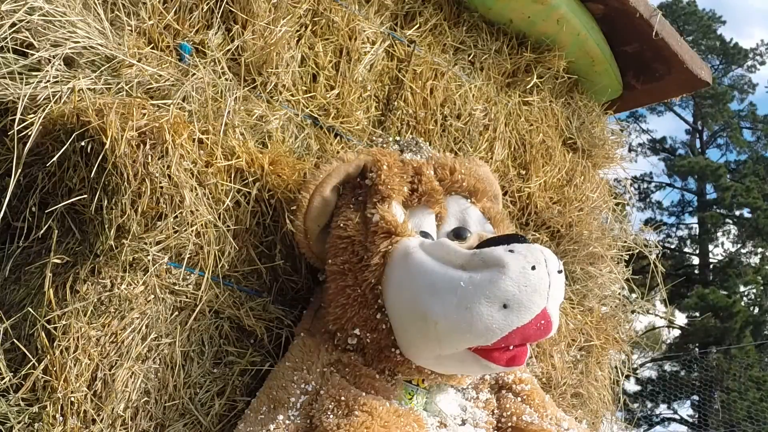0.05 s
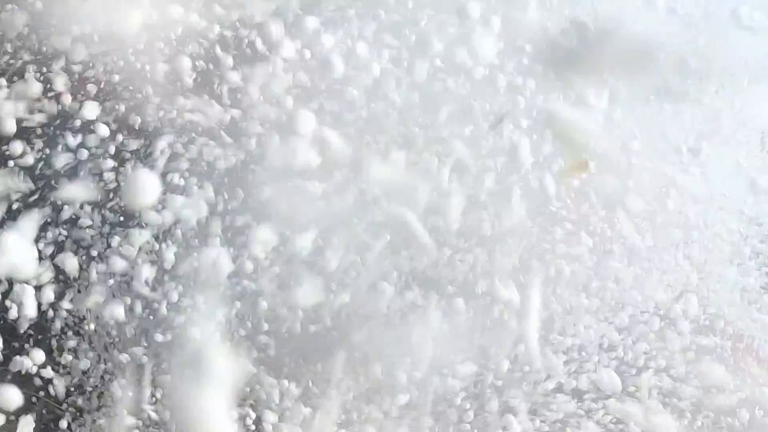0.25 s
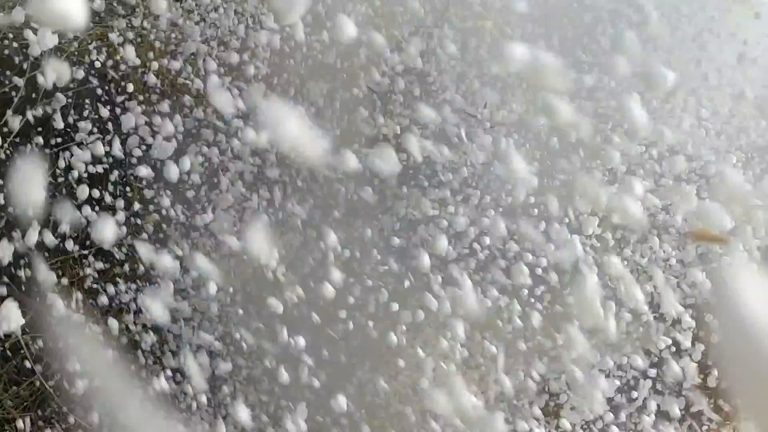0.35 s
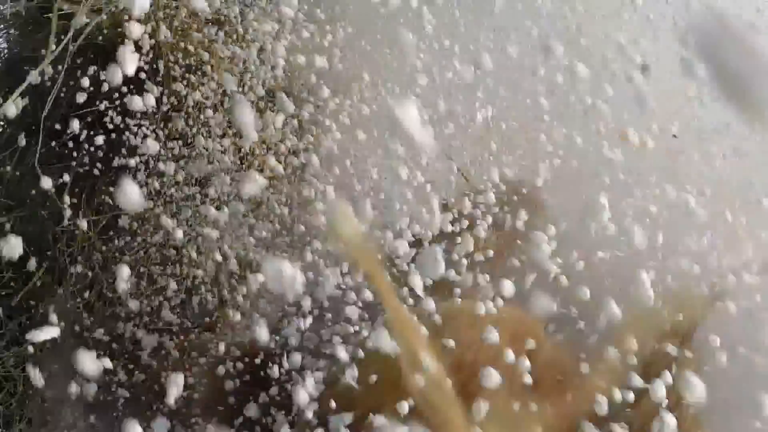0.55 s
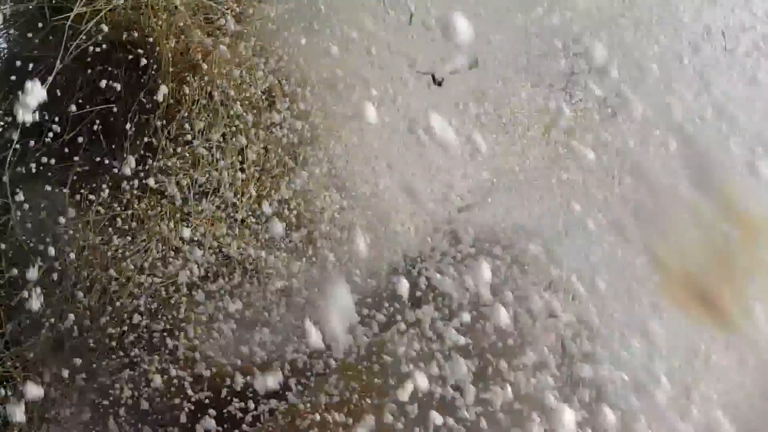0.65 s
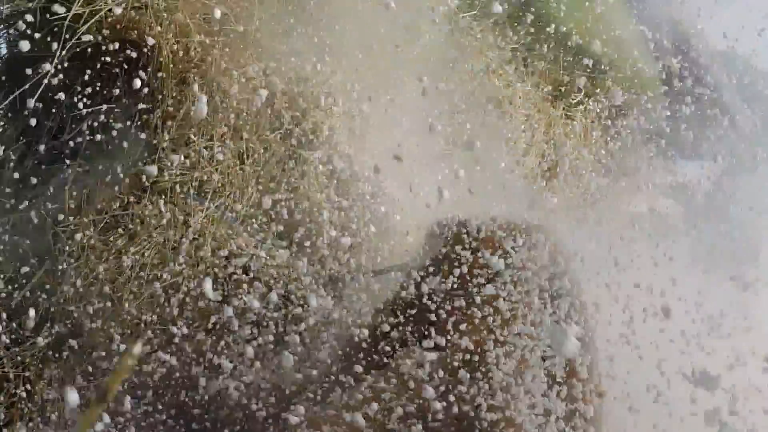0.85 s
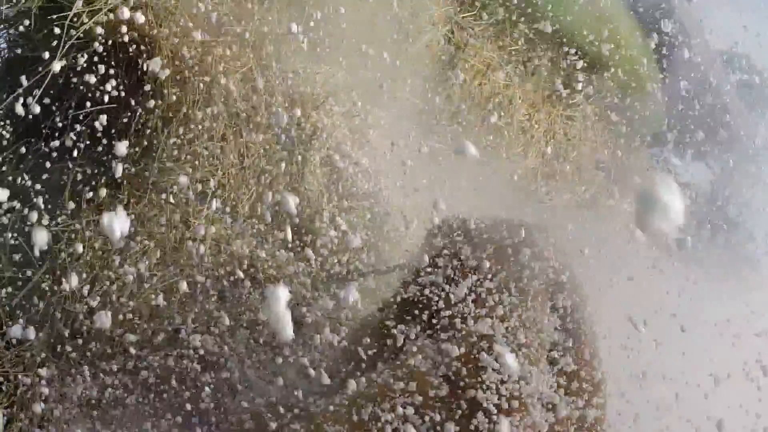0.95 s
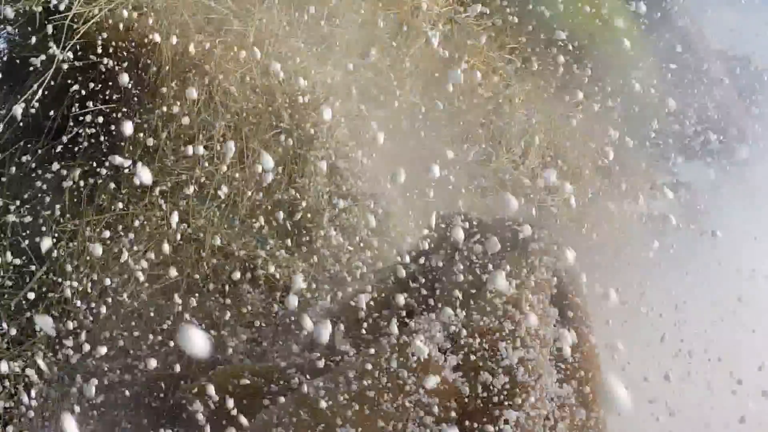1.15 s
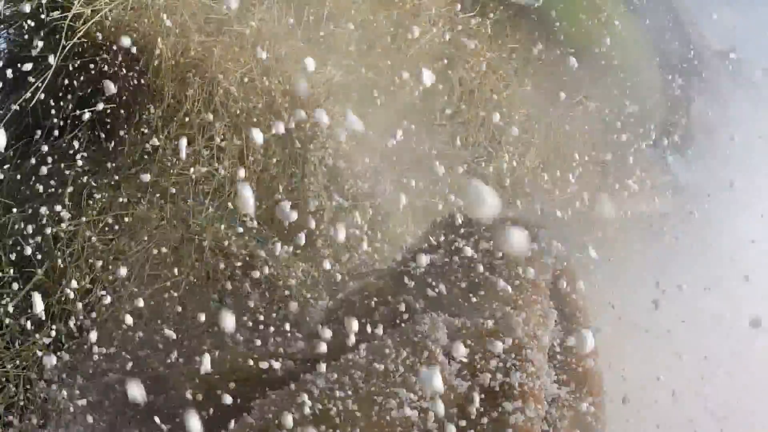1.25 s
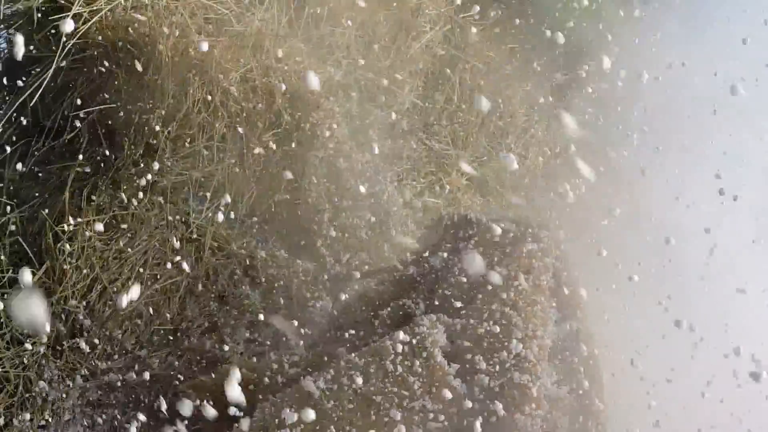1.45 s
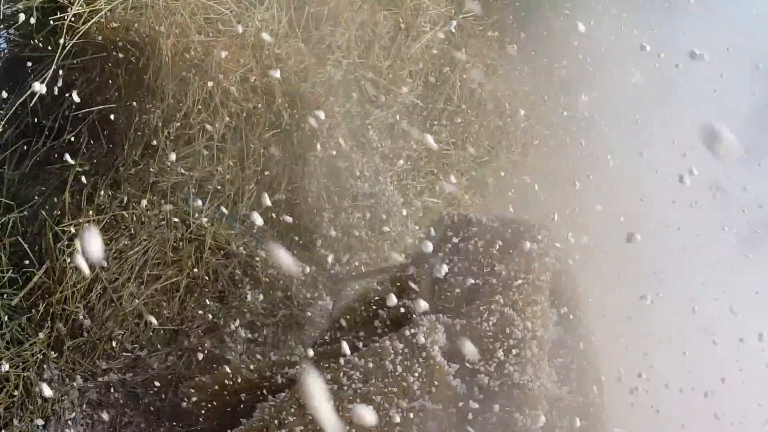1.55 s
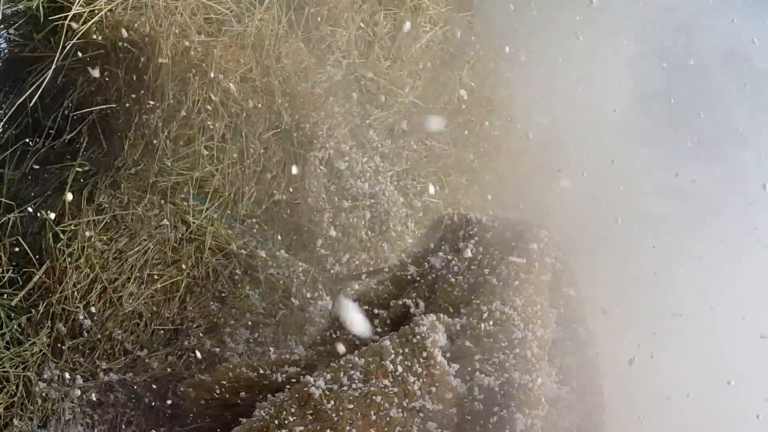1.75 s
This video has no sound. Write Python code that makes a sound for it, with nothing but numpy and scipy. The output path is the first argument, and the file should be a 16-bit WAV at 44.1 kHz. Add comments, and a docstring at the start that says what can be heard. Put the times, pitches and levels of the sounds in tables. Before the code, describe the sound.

After a brief near-silence outdoors, a pressurised bottle explodes right beside a small camera with a hard clipped crack; spray hisses and pellets rattle and knock on its plastic housing, thinning before a second small flurry.

```python
"""Outdoors, quiet air and a distant hum lie under everything; a faint noise rustle comes just before the burst.
A pressurised bottle bursts close beside a small camera: steep pressure fronts and a crack overload its microphone.
At once pellets (noise scratches through resonances) and spray (dense noise grains) pelt the plastic housing;
its modes ring, lumps knock it and it swings on its mount, while the gas cloud buffets the microphone as low noise.
The spray thins out, then swells again with a second cluster of pellets before the air and hum remain."""
import sys
import numpy as np
from scipy import signal
from scipy.fft import rfft, irfft, next_fast_len
from scipy.io import wavfile
from scipy.ndimage import uniform_filter1d, map_coordinates

SR = 44100
rng = np.random.default_rng(int(sys.argv[2]) if len(sys.argv) > 2 else 0)


def store_pcm(level_fs):
    """Save levels as 16-bit WAV."""
    pcm = np.round(np.clip(level_fs, -1, 1) * 32767).astype(np.int16)
    wavfile.write(sys.argv[1], SR, np.atleast_2d(pcm).T)


N = 79380

# open air around the microphone: pitch_hz, density_db (relative, per Hz)
AIR_SPECTRUM = [(25, -12), (60, -14.5), (118, -8.5), (250, -13), (500, -18.5), (1000, -23), (1500, -25),
                (3100, -29.5), (5000, -34), (6060, -32.5), (7350, -41.5), (12000, -45.5), (15000, -56)]
AIR_DB = -56.5
HUM_HZ, HUM_WIDTH_HZ, HUM_DB = 105, 2.1, -61.5

# gas cloud buffeting the microphone: start_s, level_db
BUFFET_LEVEL = [(.27, -47), (.3, -39.5), (.45, -41), (.55, -50.5), (.8, -53), (1.2, -61), (1.5, -61.5)]
# its bass colour: pitch_hz, density_db (relative, per Hz)
BUFFET_SPECTRUM = [(25, -11.5), (50, 9), (100, 3), (170, -1.5), (280, -13.5), (400, -23)]
# low mids of the gas cloud: start_s, level_db
SWIRL_LEVEL = [(0.27, -48.5), (0.37, -49.5), (0.42, -46.5), (0.526, -54), (0.678, -58.5), (0.8, -73)]
# their colour: pitch_hz, density_db (relative, per Hz)
SWIRL_SPECTRUM = [(150, -6), (300, -7), (600, -11.5), (1000, -13.5), (1600, -10.5)]

# swings of the camera mount after a shove: start_s, level_db, pitch_hz
MOUNT_SWINGS = [(0.256, -28.5, 128), (0.306, -30, 99), (0.343, -27, 141), (0.376, -23.5, 128.5),
                (0.419, -29.5, 171.4), (0.429, -20.5, 64.8), (0.528, -34, 89), (0.58, -27, 70.5),
                (0.653, -31, 87), (0.774, -27, 89), (0.829, -29.5, 88.7), (.89, -41, 89), (0.939, -36, 105),
                (0.991, -39.5, 110.3), (1.029, -39.5, 88.4), (1.096, -33, 100.7), (1.169, -46.5, 83.4),
                (1.21, -39.5, 85.3), (1.371, -43.5, 101)]
SWING_RISE_S, SWING_T60_S = 0.0053, 0.14

# dull knocks on the housing: start_s, level_db, pitch_hz
KNOCKS = [(0.2522, -26, 350), (0.264, -13.5, 320), (.291, -27.5, 700), (0.302, -24, 248),
          (.318, -25.5, 196), (.348, -28, 450), (0.38, -36, 400), (0.388, -21, 215), (0.4223, -20, 393),
          (0.464, -25.5, 298), (.51, -28, 285), (.578, -26, 696), (0.6108, -29, 607), (0.705, -18.5, 600),
          (.763, -27, 550), (0.795, -28.5, 785), (0.8602, -32, 700), (.879, -33, 825), (1.22, -33, 650),
          (1.2972, -29, 620), (1.447, -34.5, 700), (1.492, -33, 635)]
KNOCK_FADE_CYCLES = 0.54  # until it has faded to about a third

# resonances of the struck housing, in three groups: pitch_hz, width_hz, level_db (relative)
LOW_RESONANCES = [(1676, 410, -6), (2433, 410, 3.5), (3440, 1200, -4)]
UPPER_RESONANCES = [(4822, 750, -5), (6470, 1100, -4.5)]
TREBLE_RESONANCES = [(8500, 2500, 0.5), (10850, 3600, 1.5), (13700, 9700, -6)]
LOW_EDGE_HZ, UPPER_EDGE_HZ = 3450, 5800  # these two groups fall off steeply above

# fine spray on the housing: start_s, level_db (of the summed groups, before their mix)
SPRAY_LEVEL = [(.24, -73), (.25, -44), (.27, -39), (.3, -35.5), (.4, -37.5), (.5, -43), (.56, -41.5),
               (.62, -47.5), (.7, -47), (.77, -57.5), (.81, -59.5), (1, -75), (1.35, -63.5), (1.4, -49.5),
               (1.53, -50), (1.6, -61.5), (1.7, -62.5), (1.8, -76)]
# gain of the spray's treble group as it thins: start_s, gain_db
SPRAY_TREBLE_GAIN = [(.24, 6), (.4, 5), (.7, -2), (1.3, -7)]
# mean mix of the spray, one per group low, upper, treble: level_db
SPRAY_MIX = [-3, -9.5, -22]
# steady hiss added to the grain envelope of rms 1, one row per group low, upper, treble: share (ratio)
SPRAY_HISS = [
    [1],
    [0.87],
    [.2],
]
GRAINS_PER_S, GRAIN_SPREAD_DB, GRAIN_FADE_MS = 2500, 3.5, .5
SHIFT_PER_S, SHIFT_DB = 60, 3.5  # pace and spread of the changes in balance

# hard pellets that ring the housing: start_s (nearest pellet is used), level_db, favoured_hz, loss_db (per octave)
RINGING_BLOWS = [(.2426, -11.5, 1900, 29), (.3972, -27, 1990, 25), (.6098, -17, 1130, 7.5),
                 (.6976, -30, 4700, 10), (.7053, -27, 2100, 10), (.7635, -18, 2000, 17),
                 (.8591, -29, 2220, 18), (.8786, -41, 1810, 8), (0.9921, -30, 2140, 16),
                 (1.1152, -37.5, 2250, 19), (1.2191, -30.5, 2320, 9.5), (1.2977, -21.5, 3040, -1),
                 (1.533, -35, 2106, 7)]
# modes of the housing: pitch_hz, level_db (relative), t60_s
HOUSING_MODES = [(1096, -14.5, 0.045), (1848, -19, 0.067), (2080, -10, 0.055), (2570, -0.5, 0.021),
                 (2710, -25.5, 0.062), (2790, -12.5, 0.044), (4170, -4, 0.036), (4970, -5, 0.021)]
MODE_SPREAD_DB = 0.32

# pellets on the housing: start_s, low_db, upper_db, treble_db (level of each group), length_ms
PELLETS = [(0.2426, -9.5, -7.5, -30, 2.64), (0.248, -34, -28, -41, 3.1), (0.262, -22.5, -28, -45, 3.7),
           (0.277, -45, -28, -42, 3), (0.2878, -33, -33, -45, 11), (0.3013, -38, -50, -49, 14),
           (0.3142, -45, -47, -52, 3.1), (0.3207, -48, -47, -54, 12), (0.3333, -38, -22.5, -42, 2.9),
           (0.338, -47, -42, -39, 5.5), (0.3494, -44, -19.5, -40, 3), (0.3552, -26, -29.5, -43.0, 5.8),
           (0.3646, -39, -28, -41, 4.1), (0.3726, -26, -34, -36, 3.3), (0.379, -26.5, -43, -51.0, 8.9),
           (0.3912, -30, -34.0, -45, 7.1), (0.3971, -19, -24, -51, 3.6), (0.4088, -29, -44, -59, 3.1),
           (0.4196, -36, -54, -58, 2.5), (0.4383, -47, -29, -49, 5.1), (0.453, -32, -31, -45, 3.4),
           (0.459, -30.5, -40, -40, 4.7), (0.472, -36, -50, -53, 4.7), (0.4902, -29, -34, -35, 2),
           (0.4957, -32, -56, -56, 9.3), (0.501, -27, -54, -55, 7.6), (0.5067, -34, -19.5, -55, 2.1),
           (0.5232, -25, -24.5, -53, 3.2), (0.532, -36, -30, -47, 3), (0.5542, -35, -27, -32.5, 3.0),
           (0.5594, -48, -37, -53, 2.5), (0.571, -33, -41.0, -61, 5.2), (0.5789, -22.5, -46, -48.0, 1.4),
           (0.5823, -39, -32, -45, 2), (0.6012, -23, -37, -44.5, 8), (0.6098, -17, -19.5, -47, 1.4),
           (0.618, -23, -35, -52, 4.3), (0.63, -34.0, -55, -63, 2.9), (0.6359, -29, -57, -71.0, 1.2),
           (0.6421, -28, -50, -63, 3.5), (0.652, -49, -33, -45, 1.6), (0.6569, -32, -18, -44, 3.7),
           (0.6646, -40, -48, -61.0, 2.2), (0.6875, -37, -40, -59, 1.6), (0.6978, -37, -13.5, -30.5, 0.95),
           (0.7053, -15, -45, -40, 2.2), (0.7142, -32, -41, -38.5, 1.8), (0.724, -28, -54, -62, 4.6),
           (0.7391, -25.5, -34, -58, 3.8), (0.754, -40, -59, -71.0, 2.6), (0.7627, -24, -35, -29.5, 7.3),
           (0.7726, -34, -35, -34, 5.3), (0.7838, -27, -46, -68, 1.7), (0.7915, -41, -68, -68.0, 9.4),
           (0.859, -24, -28.5, -31, 2.4), (0.8779, -29, -45.5, -69, 6.3), (0.92, -48.5, -60, -64, 1.3),
           (0.934, -93, -50.5, -51.5, 4.7), (0.9641, -44.5, -40.5, -52, 3.1), (0.9929, -21, -33, -47, 3.3),
           (1.0802, -40, -51.5, -65.5, 10.5), (1.1165, -31.5, -40, -54.5, 4.5), (1.151, -47.5, -69, -70, 2),
           (1.1984, -44, -55, -57, 5.7), (1.22, -20, -19.5, -35.5, 2.76), (1.2975, -7, -10, -46.5, 3.24),
           (1.3502, -46, -34.5, -51, 2.9), (1.3763, -34.5, -29.5, -55, 4.6), (1.382, -42, -26, -36, 3.6),
           (1.392, -27, -26.5, -40, 3), (1.3978, -31, -41, -37, 3.7), (1.4125, -37, -37, -44, 1.6),
           (1.4246, -33, -31, -32, 4.1), (1.4369, -39, -34, -44, 1.8), (1.44, -38, -48, -40, 2.0),
           (1.447, -31, -23, -42, 3.6), (1.4529, -26.5, -26.5, -37, 3.2), (1.4609, -34, -40, -37, 1.7),
           (1.4642, -38, -36, -60.0, 2.6), (1.4816, -33, -33.5, -44.5, 3.5), (1.4932, -25, -29, -44, 3.3),
           (1.5002, -34.5, -46, -49, 3.6), (1.5066, -35, -37.5, -52.0, 6.2),
           (1.5181, -29, -40.5, -33.5, 2.6), (1.53, -29, -35, -52, 4.2), (1.535, -28.0, -37, -38, 2.7),
           (1.557, -52.5, -47, -58, 5.2), (1.57, -39.5, -35, -44, 2.5), (1.5863, -33.5, -40, -38.5, 5.8),
           (1.598, -31.5, -53, -60, 4.1), (1.635, -54, -58, -67.5, 2), (1.67, -43, -51.5, -54.5, 3.3),
           (1.686, -35.5, -38, -40.5, 3.4), (1.6985, -38.5, -44, -45.5, 3.3),
           (1.7141, -37, -46, -45.5, 3.5)]
# loud pellets whose groups lean to or from their top resonance: start_s, low_lift_db, upper_lift_db
PELLET_LEANS = [(.262, -7, 3), (.277, 0, -5), (.3331, 4, -4.5), (.3492, 0, -22), (.3643, 0, 12),
                (.3968, -5.5, 2), (.4383, 4, -14), (.5063, -4, -27), (.6097, -10, -12), (.6569, -3, -7.5),
                (.6974, -7, -13), (.7054, -7, 0), (.7134, 10, 6), (.8587, 5, -9), (.9925, -0.5, 4),
                (1.22, 2, 8.5), (1.2975, 5, -3.5), (1.3501, -3.5, 14), (1.392, 9.5, 10), (1.447, 7, -8.5),
                (1.597, 10.5, 10)]
FADE_PER_LENGTH = 0.45  # the scratch fades to about a third in this share of its length
TICK_MS = 8.64  # first contact over the scratch: (this / length) squared, so short hits are nearly one tick
COLOUR_SPREAD, LEAN_SPREAD_DB, LEAN_MATCH_S = .025, 4, .003

# pressure fronts, direct then off nearby surfaces: start_s, level_db, push_ms, rebound (share), rise_ms
SHOCK_FRONTS = [(.23931, 24.5, .99, 1, .2), (.24043, 20, .06, 0, .08), (.24185, 25.5, .27, 0, .4),
                (.2436, 5.5, 1.5, .3, .9)]
# colour of the crack and the rustle: pitch_hz, density_db (relative, per Hz)
CRACK_SPECTRUM = [(300, 3.5), (1500, 5.5), (4000, -4), (8000, -12.5), (15000, -42)]
CRACK_S, CRACK_DB, CRACK_T60_S = .2385, -6.5, 0.017
RUSTLE_S, RUSTLE_DB, RUSTLE_T60_S = .141, -50, 0.082

# the microphone
BASS_CUT_HZ, CLIP_HARDNESS, TOP_HZ = 25, 14, 15700


def amp(db):
    """Amplitude ratio of a level in dB."""
    return 10 ** (np.asarray(db) / 20)


def unit(x):
    """x scaled to rms 1."""
    return x / np.sqrt(np.mean(x ** 2) + 1e-20)


def filtered(x, response):
    """x shaped by a complex response of frequency, zero-padded so that tails do not wrap."""
    size = next_fast_len(N + SR // 2)
    return irfft(rfft(x, size) * response(np.fft.rfftfreq(size, 1 / SR)), size)[..., :N]


def noise(spectrum):
    """Coloured noise of rms 1, with steep skirts outside the spectrum."""
    below = (spectrum[0][0] * .7, -120)
    above = (spectrum[-1][0] * 1.15, -120)
    f, db = np.transpose([below] + list(spectrum) + [above])
    colour = lambda hz: amp(np.interp(np.log(hz + 1), np.log(f), db))
    return unit(filtered(rng.standard_normal(N), colour))


def curve(rows):
    """Gain per sample: practically silent before the first row, held after the last."""
    s, db = np.transpose(rows)
    return amp(np.interp(np.arange(N) / SR, s, db, left=-120, right=db[-1]))


def since(s):
    """Seconds elapsed since s, and whether it has come."""
    t = np.arange(N) / SR - s
    return np.maximum(t, 0), t >= 0


def peaks(table):
    """Response of causal damped resonances, summed with alternating sign."""
    def response(f):
        total = 0
        for k, (centre, width, db) in enumerate(table):
            damping = 1j * f * width
            total = total + (-1) ** k * amp(db) * damping / (centre ** 2 - f ** 2 + damping)
        return total
    return response


def soft(edge_hz):
    """Response of a causal steep low-pass."""
    return lambda f: 1 / (1 + 1j * np.sqrt(2) * f / edge_hz - (f / edge_hz) ** 2) ** 2


def groups(f, lean_db=(0, 0)):
    """Responses of the housing's three groups; lean_db lifts the top resonance of the low and upper ones."""
    low, upper = [list(body[:-1]) + [np.add(body[-1], [0, 0, db])]
                  for body, db in zip((LOW_RESONANCES, UPPER_RESONANCES), lean_db)]
    bass_cut = 1j * f / (1200 + 1j * f)
    return np.array([peaks(low)(f) * soft(LOW_EDGE_HZ)(f) * bass_cut,
                     -peaks(upper)(f) * soft(UPPER_EDGE_HZ)(f),
                     peaks(TREBLE_RESONANCES)(f)])


def outdoors():
    """Quiet air as coloured noise, and a far hum as noise through one narrow resonance."""
    hum = unit(filtered(rng.standard_normal(N), peaks([(HUM_HZ, HUM_WIDTH_HZ, 0)])))
    return amp(AIR_DB) * noise(AIR_SPECTRUM) + amp(HUM_DB) * hum


def gas():
    """The gas cloud buffets the microphone: bass noise and low-mid noise, each with its own level."""
    buffet = curve(BUFFET_LEVEL) * noise(BUFFET_SPECTRUM)
    swirl = curve(SWIRL_LEVEL) * noise(SWIRL_SPECTRUM)
    return buffet + swirl


def mount():
    """The camera swings on its mount: low damped sines pushed either way."""
    out = np.zeros(N)
    for s, db, hz in MOUNT_SWINGS:
        t, _ = since(s)
        envelope = (1 - np.exp(-t / SWING_RISE_S)) * amp(-60 * t / SWING_T60_S)
        out += amp(db) * rng.choice([-1, 1]) * np.sin(2 * np.pi * hz * t) * envelope
    return out


def knocks():
    """Heavy lumps knock the housing dully: one quickly damped swing either way."""
    out = np.zeros(N)
    for s, db, hz in KNOCKS:
        cycles = hz * since(s)[0]
        envelope = np.minimum(4 * cycles, 1) * np.exp(-cycles / KNOCK_FADE_CYCLES)
        out += amp(db) * rng.choice([-1, 1]) * np.sin(2 * np.pi * cycles) * envelope
    return out


def spray():
    """Dense tiny noise grains and hiss excite the housing's resonances, whose balance keeps shifting."""
    ticks = (rng.random(N) < GRAINS_PER_S / SR) * amp(GRAIN_SPREAD_DB * rng.exponential(size=N))
    grains = signal.lfilter([1], [1, -np.exp(-1000 / (GRAIN_FADE_MS * SR))], ticks)
    envelope = unit(grains) + np.array(SPRAY_HISS)
    parts = filtered(envelope * rng.standard_normal((3, N)), groups)
    knots = rng.standard_normal((3, int(N * SHIFT_PER_S / SR) + 4))
    knot_position = np.arange(N) * SHIFT_PER_S / SR
    mixed = []
    for db, part, knot in zip(SPRAY_MIX, parts, knots):
        shift_db = SHIFT_DB * map_coordinates(knot, [knot_position])  # smooth between knots
        mixed.append(amp(db + shift_db) * unit(part))
    low, upper, treble = mixed
    return curve(SPRAY_LEVEL) * (low + upper + curve(SPRAY_TREBLE_GAIN) * treble)


def ringing():
    """Hard pellets set off the housing's decaying modes, weighted by distance from each blow's favoured pitch."""
    out = np.zeros(N)
    for s, level_db, near_hz, loss_db in RINGING_BLOWS:
        pellet_s = min((pellet[0] for pellet in PELLETS), key=lambda hit_s: abs(hit_s - s))
        t, _ = since(pellet_s)
        onset = 1 - np.exp(-t * 1000)
        for hz, mode_db, t60 in HOUSING_MODES:
            away_db = loss_db * abs(np.log2(hz / near_hz))
            start_db = level_db + mode_db - away_db + rng.normal(0, MODE_SPREAD_DB)
            out += amp(start_db - 60 * t / t60) * np.sin(2 * np.pi * hz * t) * onset
    return out


def pellets():
    """Each pellet is a tick and a short noise scratch, with the housing's resonances shifted slightly at random."""
    out, t = np.zeros(N + SR), np.arange(SR // 16) / SR
    f = np.fft.rfftfreq(len(t), 1 / SR)
    for s, low_db, upper_db, treble_db, ms in PELLETS:
        scratch = rng.standard_normal((3, len(t))) * np.exp(-t * 1000 / (FADE_PER_LENGTH * ms))
        scratch[:, 0] = (TICK_MS / ms) ** 2
        random_lean = rng.normal(0, LEAN_SPREAD_DB, size=2)
        lean_db = next((db for at_s, *db in PELLET_LEANS if abs(at_s - s) < LEAN_MATCH_S), random_lean)
        shift = np.exp(rng.normal(0, COLOUR_SPREAD))
        parts = irfft(rfft(scratch) * groups(f * shift, lean_db), len(t))
        # level is set by the loudest stretch of 50 samples
        peak = np.sqrt(2 * uniform_filter1d(parts ** 2, size=50).max(axis=1))
        out[round(s * SR):][:len(t)] += (amp([low_db, upper_db, treble_db]) / peak) @ parts
    return out[:N]


def push(s, push_ms, rebound, rise_ms):
    """One pressure front and its rebound, inverted by the microphone."""
    ms = since(s)[0] * 1000
    u = ms / push_ms
    rise = 1 - np.exp(-(ms / rise_ms) ** 2)
    return -rise * (1 - rebound * u) * np.exp(-u)


def rustle():
    """A faint decaying rustle of noise before the burst."""
    t, on = since(RUSTLE_S)
    return on * amp(RUSTLE_DB - 60 * t / RUSTLE_T60_S) * noise(CRACK_SPECTRUM)


def burst():
    """The bottle bursts: direct and reflected pressure fronts with a crack of decaying noise."""
    t, on = since(CRACK_S)
    onset = np.minimum(t * 1000, 1) ** 2  # over 1 ms
    crack = on * onset * amp(CRACK_DB - 60 * t / CRACK_T60_S) * noise(CRACK_SPECTRUM)
    fronts = sum(amp(db) * push(s, *shape) for s, db, *shape in SHOCK_FRONTS)
    return fronts + crack


def scene():
    """Everything that reaches the microphone, as one channel."""
    background = outdoors() + gas()
    housing = mount() + knocks() + spray() + ringing() + pellets()
    return (background + housing + rustle() + burst())[None]


def record(dry):
    """The microphone rolls off the bass, overloads with a hard knee, then limits the band."""
    x = filtered(dry, lambda hz: 1j * hz / (BASS_CUT_HZ + 1j * hz))
    x = x / (1 + np.abs(x) ** CLIP_HARDNESS) ** (1 / CLIP_HARDNESS)
    return filtered(x, lambda hz: 1 / (1 + (hz / TOP_HZ) ** 60))


dry = scene()
out = record(dry)
store_pcm(out)
```